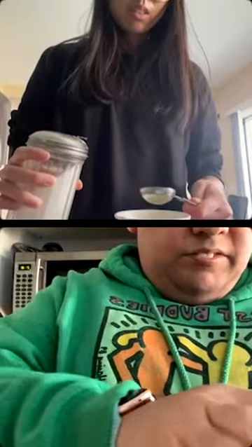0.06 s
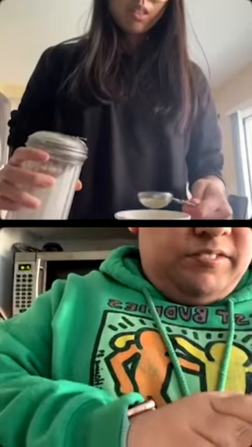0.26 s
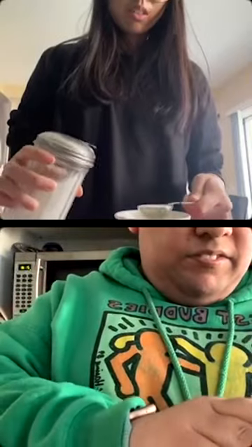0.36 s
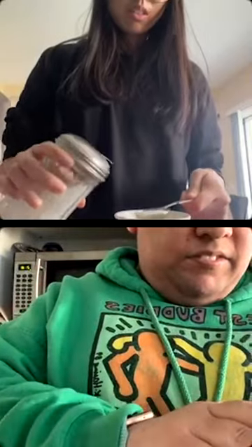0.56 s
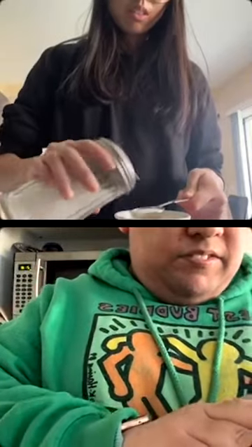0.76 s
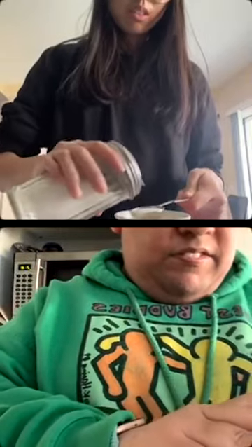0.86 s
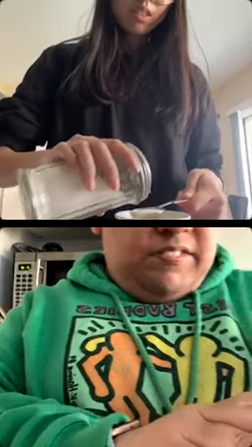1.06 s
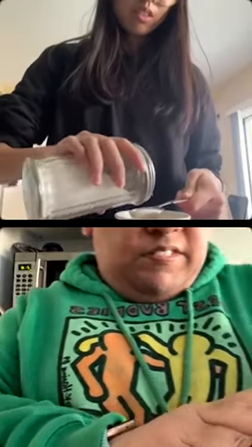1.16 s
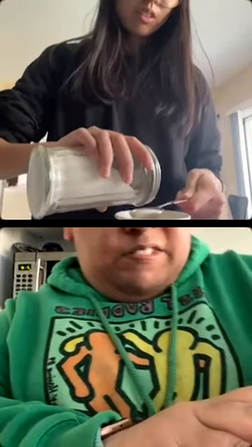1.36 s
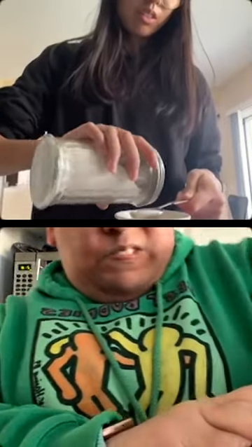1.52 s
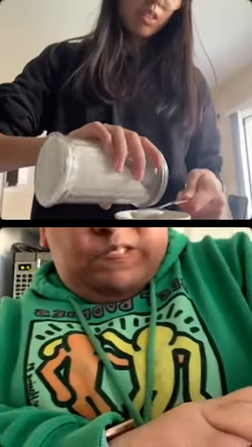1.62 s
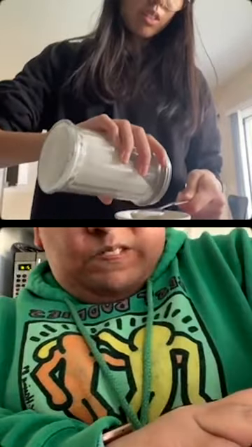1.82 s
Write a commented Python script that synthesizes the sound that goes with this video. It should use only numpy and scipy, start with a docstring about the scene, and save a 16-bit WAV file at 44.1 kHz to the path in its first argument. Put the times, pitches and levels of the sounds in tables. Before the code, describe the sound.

A glass sugar jar is handled close to the microphone in a small quiet kitchen: dull worktop knocks with lid ticks and grainy rattle, a near pause, softer knocks, then a spoon clunks against a mug.

```python
"""First a quiet room hum, a faint rattle and a lid tick, then dull knocks: a kitchen heard close up.
A glass sugar jar, a mug and a steel spoon are handled on a hollow worktop.
Knocks and ticks are sums of fading sine waves; knocks add a short slap, a noisy thud and a low shudder.
Sugar and loose lid rattle as random grains shaped by the jar; the spoon scrapes the rim in grainy strokes.
The room answers with a fading echo, and its hum is filtered noise."""
import sys
import numpy as np
from scipy import signal
from scipy.fft import rfft, irfft, next_fast_len
from scipy.io import wavfile
from scipy.ndimage import uniform_filter1d, map_coordinates

SR = 44100
rng = np.random.default_rng(int(sys.argv[2]) if len(sys.argv) > 2 else 0)


def int16_out(signal):
    """Quantize to a 16-bit WAV file."""
    q = np.round(np.clip(np.atleast_2d(signal).T, -1, 1) * 32767)
    wavfile.write(sys.argv[1], SR, q.astype(np.int16))


N = 83790  # length in samples

# Room hum, tone colour: pitch_hz, relative level_db
HUM_COLOUR = [(25, 6.5), (70, -17.5), (152, -13.5), (301, -4), (653, -12), (797, -12.5), (1770, -26),
              (2360, -25.5), (4370, -30), (11800, -34.5), (15400, -36)]
# Room hum, loudness over time: time_s, level_db
HUM_LEVEL = [(0, -58), (.6, -58.5), (0.948, -61.5), (1.201, -63), (1.499, -59.5), (1.9, -56)]
# Rattles of sugar and loose lid: start_s, level_db, rise_s, time to fade by 60 dB_s,
# colour centre_hz, colour spread_octaves
RATTLES = [(0, -51.5, 0.00027, 0.12, 3900, 1.4), (0.035, -56.5, 0.0029, 0.063, 4460, 0.75),
           (0.199, -52.5, 0.005, 0.67, 1470, 0.41), (0.207, -56, 0.0064, 0.34, 6500, 0.93),
           (0.2448, -28, 0.00055, 0.042, 3300, 0.41), (0.2476, -16.5, 0.00037, 0.012, 3000, 0.6),
           (0.257, -44, 0.0036, 0.52, 2770, 0.73), (0.324, -39, 0.0012, 0.17, 4888, 1.2),
           (.3255, -30.5, 0.002, 0.092, 2100, .3), (0.361, -39, 0.0014, 0.11, 4680, 1.1),
           (0.39, -44, 0.0017, 0.16, 3670, 0.86), (0.497, -62, 0.0024, 0.33, 3450, 0.54),
           (0.536, -68.5, 0.012, 1, 2430, 0.099), (0.621, -56, 0.0061, 0.22, 3570, 0.77),
           (0.7, -63, 0.0077, 0.14, 5050, 0.71), (0.807, -55.5, 0.0033, 0.1, 6900, 0.55),
           (0.844, -59, 0.0021, 0.045, 4690, 0.91), (1.03, -38.5, 0.0028, 0.15, 3070, 0.91),
           (1.042, -43, 0.0041, 0.12, 3257, 1.7), (1.257, -63.5, 0.0021, 0.053, 5000, 1.36),
           (1.313, -48.5, 0.0027, 0.16, 5440, 0.63), (1.321, -43, 0.00079, 0.17, 5200, 1.23),
           (1.34, -37, 0.0081, 0.15, 3770, 1.9), (1.593, -52.5, 0.002, 0.15, 2300, 0.77),
           (1.633, -55.5, 0.0012, 0.1, 1980, 1.34), (1.719, -54.5, 0.01, 0.15, 5030, 1.5),
           (1.734, -47.5, 0.0038, 0.14, 4940, 1.8), (1.828, -55, 0.0044, 0.039, 5370, 1.5)]
# Resonances of jar and lid that colour the rattle: pitch_hz, width_hz, level over the flat part_db
JAR_RESONANCES = [(1697, 150, 9.5), (2300, 610, 10.5), (3170, 250, 8), (3840, 270, 5.5), (6370, 600, 5.5),
                  (8640, 820, 4.5)]
# Ticks of lid, lid flap and spoon: start_s, level_db, colour centre_hz, colour spread_octaves
LID_TICKS = [(.003, -51, 4850, 1), (.365, -41.5, 6300, 0.77), (.394, -37.5, 5990, 0.87),
             (.6235, -45.5, 3500, 0.93), (.63, -39, 3710, 0.7), (.701, -62, 4500, 0.7)]
FLAP_TICKS = [(.332, -44, 2580, 0.37), (.353, -33.5, 2560, 0.12), (1.003, -50.5, 2152, 0.54),
              (1.045, -37.5, 2500, 0.25), (1.255, -46.5, 2208, 0.32), (1.321, -40, 5500, 0.13),
              (1.322, -41, 3980, 0.14), (1.349, -38.5, 2547, 0.2), (1.352, -42, 1780, .1),
              (1.363, -45.5, 2380, 0.69)]
SPOON_TICKS = [(.842, -51, 2000, 0.13), (.843, -48, 4200, 0.24), (1.375, -48, 2110, 0.24),
               (1.594, -31.5, 2080, 1), (1.635, -40.5, 2050, 0.15), (1.853, -56, 2100, 0.13)]
# Ringing tones (modes) of lid, flap and spoon: pitch_hz, level_db, full time to fade by 60 dB_s
LID_MODES = [(2280, -0.5, 0.033), (3278, -4.5, 0.064), (3690, 9, 0.027), (6604, -5, 0.08),
             (7710, -7, 0.035)]
FLAP_MODES = [(1754, 0, 0.062), (2300, -7.5, .05), (2538, -6, 0.0973), (4040, -9, 0.08), (5310, -7.5, 0.05),
              (8400, 1.5, .05)]
SPOON_MODES = [(1740, 0, .06), (2088, 10, 0.085), (2620, 2, .06), (3700, -4, 0.04), (5200, -8, .035),
               (6210, -2, 0.036)]
# Knocks on worktop and mug: start_s, level_db, colour centre_hz, colour spread_octaves,
# ring length_share of the full fade time, slap level_db, slap pitch_hz
WORKTOP_KNOCKS = [(.022, -35, 456, 1.5, 0.49, -38, 1216), (.088, -48, 520, 0.5, 0.93, -46.5, 930),
                  (.201, -19.5, 450, 0.32, 0.54, -27.5, 989), (.263, -28, 560, 0.48, 0.39, -49, 700),
                  (.289, -32, 576, 0.14, 0.56, -61.5, 601), (.326, -10.5, 427, 0.88, 0.77, 1, 926),
                  (.3265, -14, 1110, 0.77, 0.46, -8, 415), (.358, -23.5, 900, 0.27, 0.27, -31, 991),
                  (.375, -33.5, 340, 0.44, 0.55, -38, 499), (1.033, -42, 1370, 0.051, 0.24, -62.5, 1253),
                  (1.035, -33, 292, 0.21, 0.41, -68.5, 414), (1.044, -48, 1336, 0.086, 0.38, -39, 1277),
                  (1.308, -29.5, 497, 0.53, 0.54, -26.5, 543), (1.311, -24.5, 266, 0.077, 0.74, -51.5, 449)]
MUG_KNOCKS = [(1.594, -14, 609, 0.59, 0.45, -12.5, 467), (1.618, -33.5, 600, 0.27, 0.69, -42, 682),
              (1.637, -18, 656, 0.87, 0.29, -22, 478), (1.6335, -36.5, 1330, 0.32, 0.44, -35, 1255),
              (1.664, -42, 710, 1, 1.2, -60, 810), (1.762, -32.5, 835, 0.2, 0.7, -30, 910),
              (1.775, -39, 1330, 0.33, 0.24, -45, 1310), (1.81, -48, 750, 0.13, 0.42, -51, 805),
              (1.828, -30, 617, 0.38, 0.58, -37, 766), (1.876, -45, 705, 0.17, 0.47, -68, 816)]
# Ringing tones of worktop and mug: pitch_hz, level_db, full time to fade by 60 dB_s
WORKTOP_MODES = [(148.1, -7.5, 0.1), (216, -18, 0.2435), (283.4, -12, 0.15), (309.7, 1, 0.19),
                 (418.8, 3, 0.1), (459.8, 5, 0.11), (504.6, -0.5, 0.15), (588.3, 4.5, 0.1036),
                 (655, -6.5, 0.082), (694.7, 2.5, 0.1), (888, -8.5, .1), (1019.6, -1.5, 0.12),
                 (1166, -14, 0.1703), (1308, 1.5, 0.068), (1733, -1.5, 0.09)]
MUG_MODES = [(239.5, -10, 0.24), (329, -2, 0.25), (460, 1.5, 0.07), (531, 1, 0.052), (567.5, 6, 0.054),
             (653.2, 6.5, 0.084), (712.3, 5.5, 0.1), (844, -13, 0.1), (1146, -6.5, 0.061),
             (1307, -13, 0.076)]
# Strokes of the spoon on the rim: start_s, length_s, level_db
SCRAPES = [(0.145, 0.083, -67), (0.156, 0.11, -57.5), (1.711, 0.051, -49), (1.756, 0.047, -62.5),
           (1.812, 0.035, -56.5), (1.834, 0.05, -67)]
# Resonances of the rim: pitch_hz, width_hz, level_db
RIM_RESONANCES = [(2970, 500, -10), (3610, 110, 7), (3950, 180, 1), (4400, 500, -9), (5440, 840, -13.5)]
# How fast the room's answer dies: pitch_hz, time to fade by 60 dB_s
ROOM_FADE = [(200, 0.17), (1000, 0.21), (4000, 0.16), (10000, 0.032)]
# Treble response of the microphone: pitch_hz, gain_db
MIC_TREBLE = [(8000, -1), (10500, -5.5), (11900, -11.5), (12100, -35.5), (15600, -30.5)]

WAVER_DB, WAVER_PER_S = 1.7, 12  # hum waver: depth, new random values per second
GRAINS_PER_S, GRAIN_SPREAD_DB, HISS_SHARE = 1400, 2.5, 0.45  # grains on average, uneven size, hiss in the mix
SCATTER_DB = 2.5  # random level change for each mode and blow
WOOD_BEND, HELD_BEND = 1.55, 2.02  # fade shape: 1 free, more = held at first, then damped by hand or sugar
FLUTTER_DB, FLUTTER_S = 4, 0.009  # loose contact makes each mode flutter: depth, time scale
WANDER_RAD, WANDER_HZ = 1.1, 1500  # its phase wanders too, fully from this pitch up
TICK_START_S, TICK_SHARE = 0.002, 0.5  # soft start, share of the full fade time
CONTACT_S, SLAP_CYCLES = 0.0015, 2.5  # soft start of a knock, waves in its slap
# Noisy thud and low shudder of a knock; their levels are relative to the knock
THUD_DB, THUD_T60_S, THUD_RISE_S = -10, 0.24, 0.0033
BOOM_DB, BOOM_HZ, BOOM_OCTAVES, BOOM_T60_S, BOOM_RISE_S = -31, 90, 1.5, 0.25, 0.02
ROOM_DB, ROOM_DELAY_S = -16.5, 0.0072
BASS_CUT_HZ, TOP_HZ = 66, 15700  # deep bass cut, upper band limit


def amp(db):
    """Turn decibels into a plain multiplier."""
    return 10 ** (np.asarray(db) / 20)


def unit(x):
    """Scale a sound to an average (RMS) strength of 1."""
    return x / np.sqrt(np.mean(x ** 2) + 1e-20)


def along(points, hz):
    """Read a table of (pitch, value) points, spaced by ratio of pitch as the ear hears it."""
    point_hz, values = np.transpose(points)
    return np.interp(np.log(hz + 1), np.log(point_hz + 1), values)


def filtered(x, response):
    """Change the strength and timing of each pitch in x by a response to frequency."""
    size = next_fast_len(x.shape[-1] + 8192)
    hz = np.fft.rfftfreq(size, 1 / SR)
    return irfft(rfft(x, size) * response(hz), size)[..., :x.shape[-1]]


def bell(hz, centre_hz, octaves):
    """Gain that falls away smoothly on both sides of a centre pitch."""
    return np.exp(-0.5 * (np.log2((hz + 1) / centre_hz) / octaves) ** 2)


def resonances(peaks):
    """Response of an object that favours a few pitches and rings only after it is driven."""
    def response(hz):
        total = 0
        for k, (centre_hz, width_hz, db) in enumerate(peaks):
            damping = 1j * hz * width_hz
            peak = damping / (centre_hz ** 2 - hz ** 2 + damping)
            total = total + (-1) ** k * amp(db) * peak  # signs alternate
        return total
    return response


def add(track, start_s, x):
    """Mix x into the track at its start time."""
    part = track[max(round(start_s * SR), 0):][:len(x)]
    part += x[:len(part)]


def hum():
    """Steady room noise, shaped by pitch, whose level wavers a little."""
    samples = np.arange(N)
    random_levels = rng.standard_normal(int(N * WAVER_PER_S / SR) + 4)
    waver = map_coordinates(random_levels, [samples * WAVER_PER_S / SR])
    level_db = np.interp(samples / SR, *np.transpose(HUM_LEVEL)) + WAVER_DB * waver
    noise = filtered(rng.standard_normal(N), lambda hz: amp(along(HUM_COLOUR, hz)))
    return amp(level_db) * unit(noise)


def gritty(count):
    """Many small contacts: sparse grains of uneven size over hiss."""
    hits = rng.random(count) < GRAINS_PER_S / SR
    sizes = amp(GRAIN_SPREAD_DB * rng.exponential(size=count))
    grains = hits * sizes * rng.choice([-1, 1], count)
    return (1 - HISS_SHARE) * unit(grains) + HISS_SHARE * rng.standard_normal(count)


def rattle():
    """Sugar and loose lid: fading bursts of grains, made stronger at the jar's resonances."""
    out = np.zeros(N)
    t = np.arange(SR // 3) / SR
    jar = resonances(JAR_RESONANCES)
    for start_s, db, rise_s, t60_s, centre_hz, octaves in RATTLES:
        def colour(hz):
            return bell(hz, centre_hz, octaves) * (1 + np.abs(jar(hz)))
        grains = unit(filtered(gritty(len(t)), colour))
        rise = np.minimum(t / rise_s, 1) ** 2
        add(out, start_s, amp(db - 60 * t / t60_s) * rise * grains)
    return out


def ring(modes, weight, share, attack_s, bend):
    """One blow sets off fading sine waves, whose sum is scaled to a peak of 1."""
    hz, db, t60_s = np.transpose(modes)[:, :, None]
    t = np.arange(SR // 5) / SR
    gain = amp(db + rng.normal(0, SCATTER_DB, hz.shape)) * weight(hz)
    # Smoothing noise twice gives slow random drifts of level and phase
    width = round(FLUTTER_S * SR)
    drift = uniform_filter1d(rng.standard_normal((2, len(hz), len(t))), width)
    swell, wander = unit(uniform_filter1d(drift, width))
    gain = gain * amp(FLUTTER_DB * swell)
    wander_depth = WANDER_RAD * np.minimum(hz / WANDER_HZ, 1)
    phase = 2 * np.pi * hz * t + wander_depth * (wander - wander[:, :1])
    fade = amp(-60 * (t / (t60_s * share)) ** bend)
    x = (gain * fade * np.sin(phase)).sum(0)
    x = x * (1 - np.exp(-t / attack_s))
    return x / np.abs(x).max()


def ticks():
    """Lid, flap and spoon: each light blow rings the modes near its colour for a short time."""
    out = np.zeros(N)
    for blows, modes in ((LID_TICKS, LID_MODES), (FLAP_TICKS, FLAP_MODES), (SPOON_TICKS, SPOON_MODES)):
        for start_s, db, centre_hz, octaves in blows:
            def colour(hz):
                return bell(hz, centre_hz, octaves)
            add(out, start_s, amp(db) * ring(modes, colour, TICK_SHARE, TICK_START_S, HELD_BEND))
    return out


def slap(pitch_hz):
    """The first contact of a knock: a few waves of one pitch that swell and vanish."""
    cycles = np.arange(0, SLAP_CYCLES, pitch_hz / SR)
    return np.sin(np.pi * cycles / SLAP_CYCLES) ** 2 * np.sin(2 * np.pi * cycles)


def burst(centre_hz, octaves, rise_s, t60_s):
    """Dense noisy part of a knock: noise around one pitch that swells and dies."""
    t = np.arange(SR // 3) / SR
    noise = unit(filtered(rng.standard_normal(len(t)), lambda hz: bell(hz, centre_hz, octaves)))
    return noise * amp(-60 * t / t60_s) * (1 - np.exp(-t / rise_s))


def knocks():
    """Worktop and mug: a slap, the modes near the knock's colour, a noisy thud and a low shudder."""
    out = np.zeros(N)
    for blows, modes, bend in ((WORKTOP_KNOCKS, WORKTOP_MODES, WOOD_BEND),
                               (MUG_KNOCKS, MUG_MODES, HELD_BEND)):
        for start_s, db, centre_hz, octaves, share, slap_db, slap_hz in blows:
            def colour(hz):
                return bell(hz, centre_hz, octaves)
            thud = burst(centre_hz, 0.6 * octaves, THUD_RISE_S, THUD_T60_S * share)
            shudder = burst(BOOM_HZ, BOOM_OCTAVES, BOOM_RISE_S, BOOM_T60_S)
            add(out, start_s, amp(slap_db) * slap(slap_hz))
            add(out, start_s, amp(db) * ring(modes, colour, share, CONTACT_S, bend))
            add(out, start_s, amp(db + THUD_DB) * thud)
            add(out, start_s, amp(db + BOOM_DB) * shudder)
    return out


def scrape():
    """Spoon on the rim: grains under a swelling stroke set off the rim's resonances."""
    out = np.zeros(N)
    for start_s, length_s, db in SCRAPES:
        count = round(length_s * SR)
        swell = np.sin(np.linspace(0, np.pi, count)) ** 1.715
        stroke = np.pad(swell * gritty(count), (0, SR // 20))  # silence leaves time to ring out
        x = filtered(stroke, resonances(RIM_RESONANCES))
        add(out, start_s, amp(db) * x / np.std(x[:count]))
    return out


def room(x):
    """The kitchen's answer: an echo of fading noise in which each pitch dies at its own speed."""
    hz, t, spectrum = signal.stft(rng.standard_normal(SR // 2), SR, nperseg=256)
    fade = amp(-60 * t / along(ROOM_FADE, hz)[:, None])
    tail = signal.istft(spectrum * fade, SR, nperseg=256)[1]
    delayed = np.pad(x, (round(ROOM_DELAY_S * SR), 0))
    return signal.fftconvolve(delayed, tail / np.linalg.norm(tail))[:N]


def scene():
    """Mix the handled objects, the room's answer to them and the hum."""
    near = rattle() + ticks() + knocks() + scrape()
    return (near + amp(ROOM_DB) * room(near) + hum())[None]


def record(dry):
    """The deep bass is cut away and the microphone dulls the treble; nothing stays above the band limit."""
    def response(hz):
        bass = (1j * hz / (1j * hz + BASS_CUT_HZ)) ** 2
        return bass * amp(along(MIC_TREBLE, hz)) * (hz < TOP_HZ)
    return filtered(dry, response)


dry = scene()
out = record(dry)
int16_out(out)
```